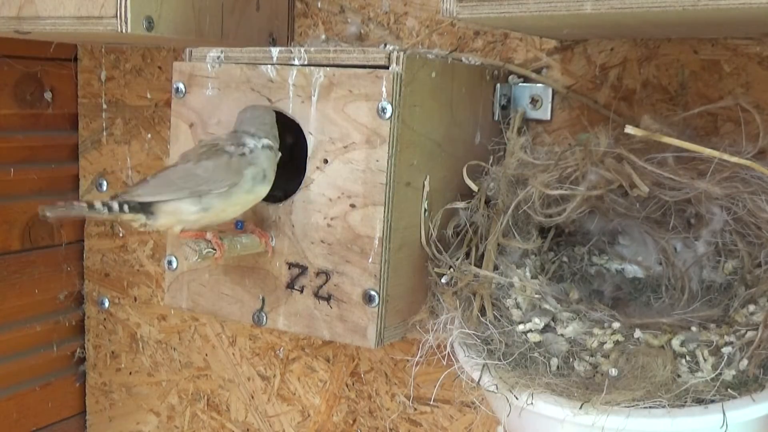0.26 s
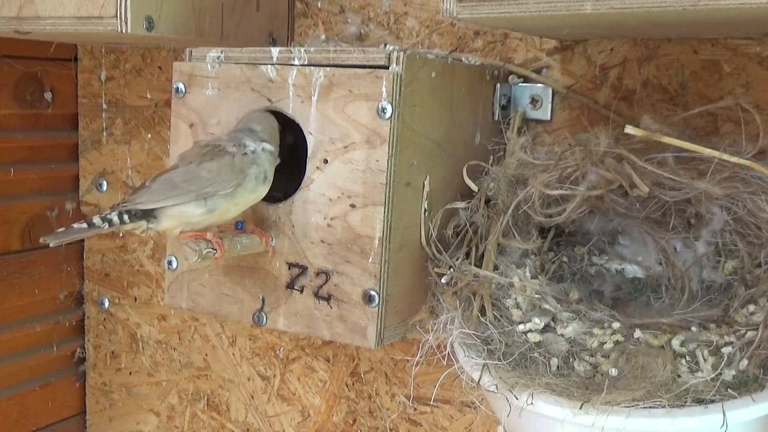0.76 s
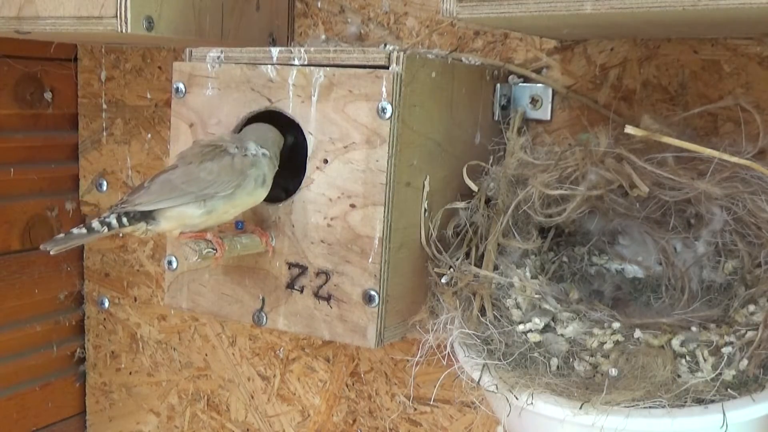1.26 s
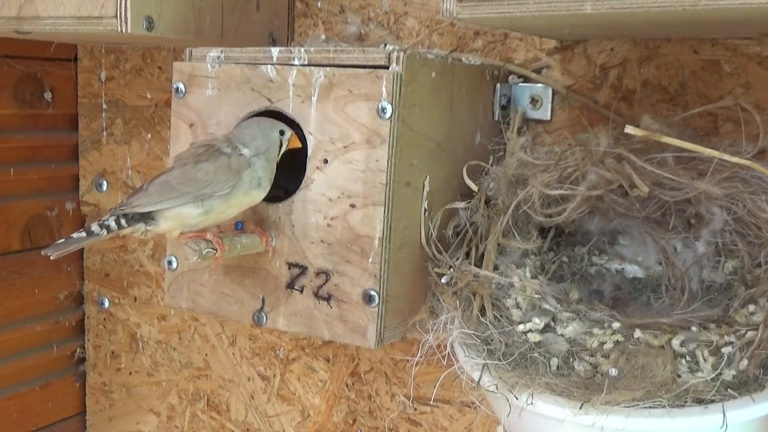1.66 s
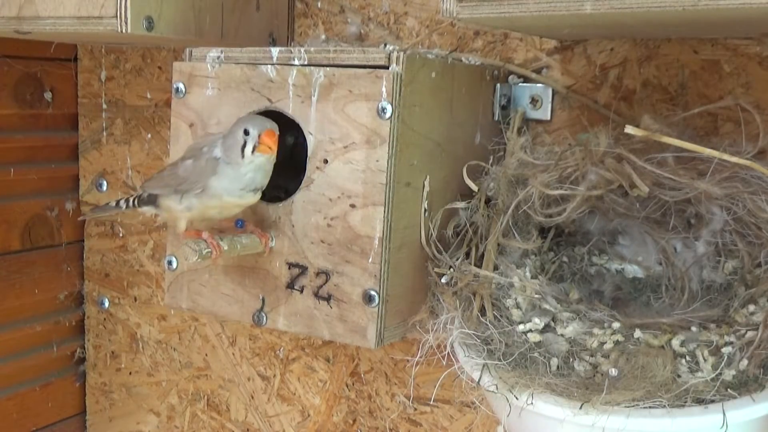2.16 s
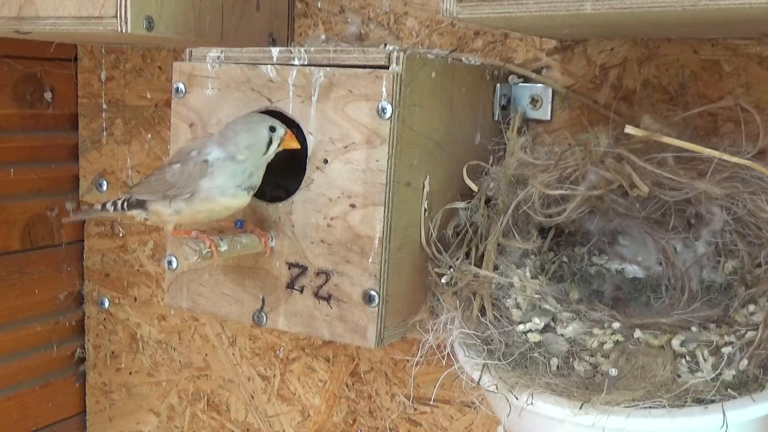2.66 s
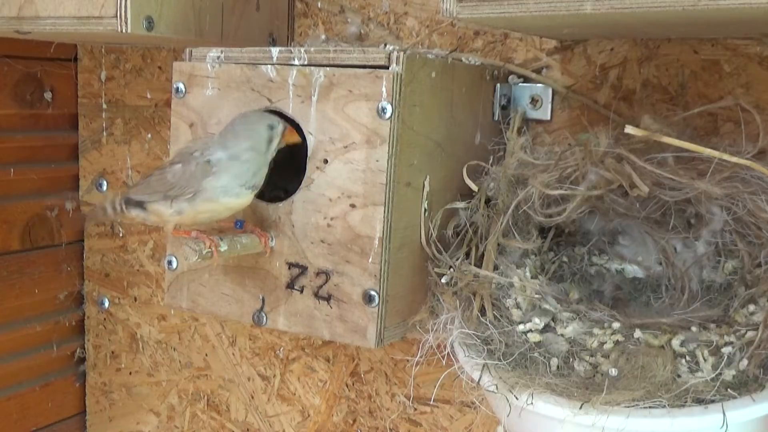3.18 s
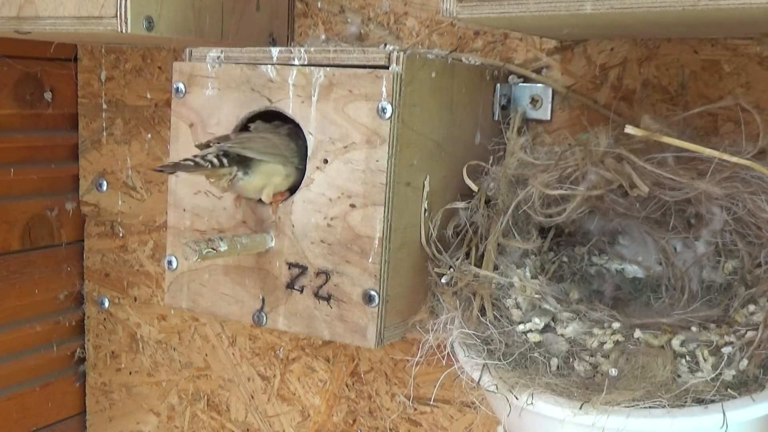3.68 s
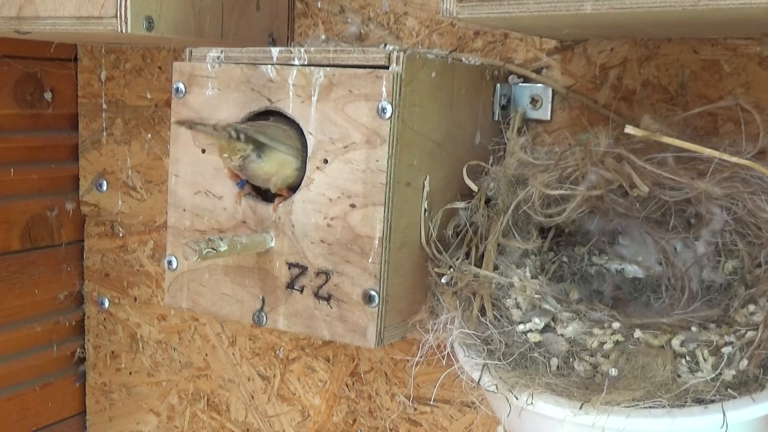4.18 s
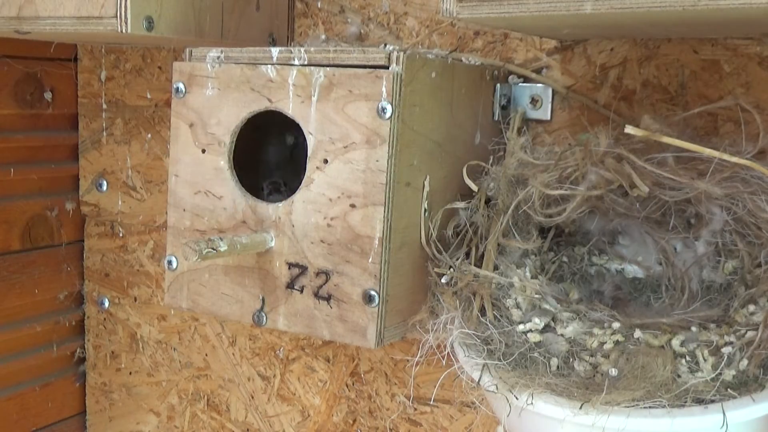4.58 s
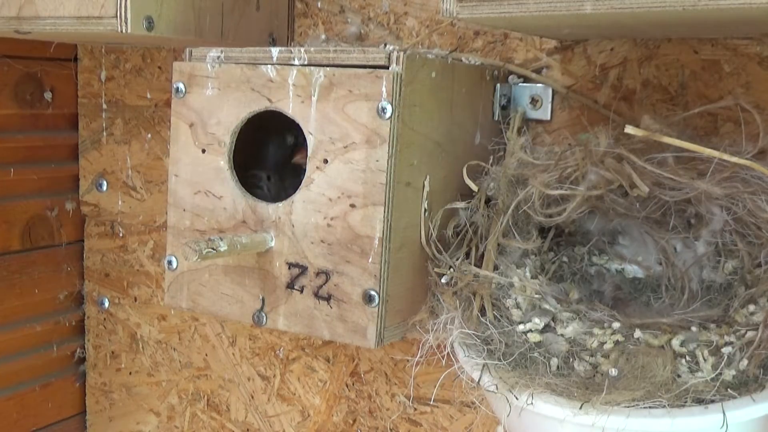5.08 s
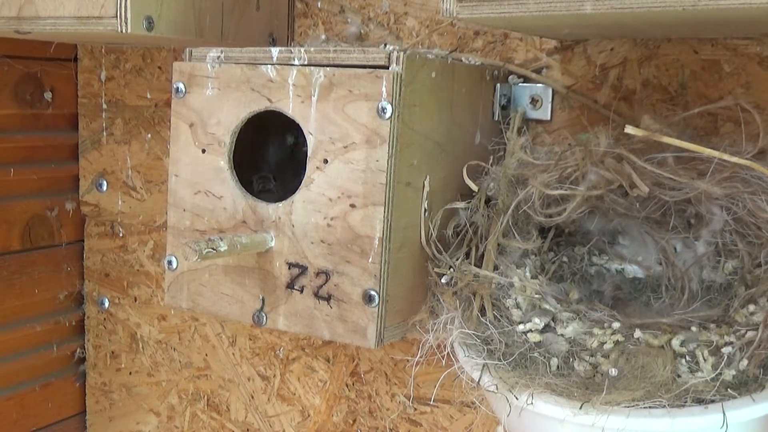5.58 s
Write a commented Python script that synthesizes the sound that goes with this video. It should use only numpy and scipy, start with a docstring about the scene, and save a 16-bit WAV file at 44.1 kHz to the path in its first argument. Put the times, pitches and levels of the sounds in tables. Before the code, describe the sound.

In a small indoor aviary, finch nestlings beg in hoarse high rasps about four times a second. Adults near and across the room add nasal beeps, short buzzes, whistles and sliding chirps, crowding into a loud flurry around three seconds. Then a bird scrabbles into a wooden box with soft thuds and claw ticks. Close stereo microphone, short room echo, faint air noise and low hum.

```python
"""Flurry in an indoor aviary

Nestlings beg in a steady run of high rasps: hoarse harmonic stacks half drowned in breath.
Adult finches, across the room and close by, trade nasal calls, pulsed buzzes, whistles and shrill
sliding chirps, with a loud flurry in the middle and the room's short echo behind them.
One bird scrabbles into a wooden nest box: filtered noise, ringing knocks and dry claw ticks.
Far chatter of patchy noise, air noise and a faint wavering hum lie underneath."""
import sys
import numpy as np
from scipy import signal
from scipy.fft import rfft, irfft, next_fast_len
from scipy.io import wavfile
from scipy.ndimage import uniform_filter1d

SR = 44100
rng = np.random.default_rng(int(sys.argv[2]) if len(sys.argv) > 2 else 0)


def boost_factor(decibels):
    """Convert a level in decibels to a linear amplitude factor."""
    exponent = np.asarray(decibels, float) / 20
    return 10 ** exponent


def store_wav(level_fs):
    """Save 16-bit WAV to argv[1]."""
    pcm = np.round(np.clip(np.atleast_2d(level_fs), -1, 1) * 32767)
    wavfile.write(sys.argv[1], SR, pcm.T.astype(np.int16))


N = 257544  # length in samples
CLOCK = np.arange(N) / SR  # seconds


def evened(x):
    """Scales to rms 1."""
    return x / np.sqrt(np.mean(x ** 2) + 1e-20)


def read(points, hz):
    """Reads a table on a log-frequency axis."""
    f, value = np.transpose(points)
    return np.interp(np.log(hz + 1), np.log(f + 1), value)


def curve(rows, column=1):
    """Joins one column of a table by straight lines over the whole length."""
    rows = np.array(rows)
    return np.interp(CLOCK, rows[:, 0], rows[:, column])


def add(mix, s, sound):
    """Mixes a sound in at time s, or at the very start if s is negative."""
    part = mix[round(max(s, 0) * SR):][:len(sound)]
    part += sound[:len(part)]


def colour(x, spectrum):
    """Filters by a spectrum in dB, then scales to rms 1."""
    length = x.shape[-1]
    size = next_fast_len(length + 512)
    gain = boost_factor(read(spectrum, np.fft.rfftfreq(size, 1 / SR)))
    filtered = irfft(rfft(x, size) * gain, size)
    return evened(filtered[..., :length])


def wander(length, seconds):
    """Smooth chance of rms 1 that changes over the given time."""
    span = max(int(seconds * SR), 1)
    smooth = uniform_filter1d(rng.standard_normal(length), span)
    return evened(uniform_filter1d(smooth, span))


def noise(alike):
    """Two channels of noise that share the part alike."""
    a, b = rng.standard_normal((2, N))
    alike = np.clip(alike, 0, 1)
    return np.array([a, alike * a + np.sqrt(1 - alike ** 2) * b])


# The faint hum under the room. Each row: time in seconds, pitch in Hz, level in dB.
HUM_PATH = [(0, 128, -50), (2.7, 128, -56), (3.3, 122, -60), (4.15, 124, -53.5), (4.3, 133, -43.5),
            (5.0, 133, -49.5), (5.3, 136, -42.5), (5.84, 137, -46.5)]


def hum():
    """A low sine that wavers in level and drifts in pitch, a little stronger on the right."""
    tone = np.sqrt(2) * np.sin(2 * np.pi * np.cumsum(curve(HUM_PATH)) / SR)
    sides_db = np.array([[-1.3], [1.3]])
    return boost_factor(curve(HUM_PATH, column=2) + 2.5 * wander(N, .03) + sides_db) * tone


# Spectrum of the air noise. Each row: frequency in Hz, relative gain in dB.
AIR_SPECTRUM = [(20, 17), (31, 3), (48, -1.5), (122, 1.5), (170, -17), (250, -6.5), (334, -23), (507, -5.5),
                (708, -16.5), (1050, -5.5), (1400, -11), (2350, -20), (7000, -18), (15600, -22)]


def air():
    """Steady noise, the same in both channels, strongest in the deepest bass."""
    return boost_factor(-38) * colour(noise(1.0), AIR_SPECTRUM)


# How fast the aviary's echo dies. Each row: frequency in Hz, time to fall 60 dB in seconds.
ROOM_DECAY = [(500, 0.11), (3000, 0.11), (8000, 0.12), (14000, 0.043)]


def room(x):
    """Echo off the walls: sparse taps of random sign, each band dying at its own speed."""
    taps = np.zeros((2, SR // 2))
    at = np.arange(200, SR // 2 - 20, 20) + rng.integers(0, 20, (2, (SR // 2 - 201) // 20))
    np.put_along_axis(taps, at, rng.choice([-1., 1.], at.shape), 1)
    taps = taps[0] + .34 * taps  # the two capsules sit close together and share most of the echo
    hz, t, z = signal.stft(taps, SR, nperseg=256)
    decay = boost_factor(-60 * t / read(ROOM_DECAY, hz)[:, None])
    tail = signal.istft(z * decay, SR, nperseg=256)[1]
    return signal.fftconvolve(x[None], tail / np.linalg.norm(tail[0]), axes=1)[:, :N]


def lulls():
    """Gain that dips briefly (or rises, where the depth is negative) just before each beg."""
    ahead_s, width_s = 0.048, 0.055
    dip_db = np.zeros(N)
    for s, _, depth_db in BEGS:
        dip_db += depth_db * np.exp(-(2 * (CLOCK - s + ahead_s) / width_s) ** 4)
    return boost_factor(-dip_db)


# Loudness of the far birds. Each row: time in seconds, level in dB.
CHATTER_LEVEL = [(0, -38), (1.05, -38.5), (1.35, -40), (1.7, -36.5), (2.45, -39), (2.9, -34.5),
                 (3.2, -33.5), (4.2, -34), (4.75, -42.5), (5.05, -34.5), (5.5, -40.5), (5.84, -41.5)]
# Spectrum of the far birds. Each row: frequency in Hz, relative gain in dB.
FAR_SPECTRUM = [(900, -14.5), (2000, -4), (3300, -2.5), (4600, -7), (7000, -2), (10500, -15.5),
                (13500, -8.5), (15700, -38)]


def chatter():
    """Birds farther off blur into noise, patchy in time and frequency, that follows the lulls."""
    hz, t, z = signal.stft(noise(0.98), SR, nperseg=512)
    patches = uniform_filter1d(rng.standard_normal(z.shape[1:]), 4, 0)
    patches = evened(uniform_filter1d(patches, 8, 1))
    blur = signal.istft(z * boost_factor(4 * patches), SR, nperseg=512)[1][:, :N]
    return boost_factor(curve(CHATTER_LEVEL)) * lulls() * colour(blur, FAR_SPECTRUM)


# Bouts of scrabbling at the nest box.
# Each row: start in seconds, length in seconds, rustle level in dB, level of the box's thud in dB.
SCRABBLE_BOUTS = [(0.12, 0.55, -43, -42.5), (0.986, 0.4, -43, -62), (3.413, 0.34, -40.5, -50),
                  (3.7, 0.61, -41, -49), (3.857, 0.21, -69, -34.5)]


def bouts(column, rest_db):
    """Gain that swells over each bout of scrabbling, on top of a resting level."""
    gain = boost_factor(rest_db) * np.ones(N)
    for row in SCRABBLE_BOUTS:
        add(gain, row[0], boost_factor(row[column]) * signal.windows.tukey(int(row[1] * SR), .45))
    return gain


def scrabble():
    """Claws and feathers rustle on wood as uneven noise, and the box thuds as deep noise."""
    scuffle = boost_factor(1.6 * wander(N, .02))
    wood = [(150, -9.0), (280, -11.0), (700, -4.0), (1200, -6.0), (2500, -25.5)]  # (Hz, dB)
    rustle = colour(noise(0.98) * scuffle, wood)
    thud = colour(noise(0.94), [(35, -4.5), (55, -3), (85, -5.5), (115, -6.0), (150, -42)])
    thud_sides = boost_factor(np.array([[-1.4], [1.4]]))  # left, right
    return bouts(column=2, rest_db=-46) * rustle + bouts(column=3, rest_db=-44) * thud * thud_sides


# Feet on the wooden box. Each row: time in seconds, level in dB.
FOOT_KNOCKS = [(0.259, -30), (0.528, -30.5), (1.275, -30), (1.918, -36), (2.723, -28.5), (3.831, -34)]


def knocks():
    """Dull bumps: the box wall rings at two low pitches for a few cycles."""
    out, t = np.zeros(N), np.arange(int(.05 * SR)) / SR
    wall = np.sin(2 * np.pi * 250 * t) + 0.62 * np.sin(2 * np.pi * 410 * t)
    for s, level_db in FOOT_KNOCKS:
        add(out, s, boost_factor(level_db - 60 * t / 0.067) * np.minimum(t / 0.0054, 1) * wall)
    return out


# Claws on wood, thin and high. Each row: time in seconds, level in dB.
CLAW_TICKS = [(0.2588, -17), (3.5319, -34), (3.5558, -29), (4.0497, -28), (4.1824, -28)]


def ticks():
    """Short dry clicks of a claw: treble noise that dies within 20 ms."""
    out, t = np.zeros(N), np.arange(int(.02 * SR)) / SR
    for s, level_db in CLAW_TICKS:
        click = colour(rng.standard_normal(len(t)), [(5000, -30), (10500, -5), (13000, 0), (15500, -1)])
        add(out, s, boost_factor(level_db - 60 * t / 0.021) * click)
    return out


# Begging rasps from the nest box. Each row: start in seconds, length in seconds,
# dip of the background just before in dB (negative for a rise).
BEGS = [(0.166, 0.19, 8), (.41, 0.16, 0.5), (0.672, 0.082, 11), (0.818, 0.2, 9), (1.107, 0.15, -6),
        (1.358, 0.15, 1), (1.6, 0.17, 5), (1.865, 0.14, 5), (2.101, 0.16, -1.5), (2.36, 0.12, -6.5),
        (2.6, 0.078, 5), (2.854, 0.1, 0), (3.118, 0.12, 16), (3.35, 0.066, 9), (3.574, 0.11, 7),
        (3.81, 0.15, 14), (4.05, 0.14, 11), (4.329, 0.14, 1), (4.568, 0.155, 1.5), (4.82, 0.14, -0.5),
        (5.075, 0.12, 2), (5.334, 0.1, -2), (5.583, 0.15, 7)]
# Spectrum through the gaping beaks. Each row: frequency in Hz, relative gain in dB.
GAPE_SPECTRUM = [(2650, -55), (4500, -21), (5930, -4), (6650, -5.5), (7190, -2.5), (7970, -7), (8670, 0.5),
                 (10500, -11), (13300, -24.5), (15600, -43)]


def begging_effort():
    """The brood warms up, then slowly tires; other broods keep up a weaker rasp between begs."""
    full_db, shy_db, warm_s, tire_db_per_s = -28, 12.5, 0.56, 0.53
    effort = boost_factor(-45.5 + 4.2 * wander(N, 0.011)) * lulls()
    for s, length, _ in BEGS:
        level_db = full_db - shy_db * np.exp(-(s / warm_s) ** 2 / 2) - tire_db_per_s * s
        add(effort, s, boost_factor(level_db) * signal.windows.tukey(int(length * SR), .55))
    return signal.lfilter([.002], [1, -.998], effort)  # the nest box rings on for a moment


def nestlings():
    """Hoarse stacks of unsteady pitch plus breath; each channel hears its own share of the brood."""
    pitch_hz = 1212
    voices = []
    for detune in (.99, 1.012):
        unsteady = 1 + 0.015 * wander(N, .03) + 0.01153 * wander(N, 0.001481)
        turns = np.cumsum(detune * pitch_hz * unsteady) / SR
        overtones = sum(np.cos(2 * np.pi * k * turns + k ** 2) for k in range(4, 13))
        rasp = .6 * evened(overtones) + rng.standard_normal(N)
        voices.append(colour(rasp, GAPE_SPECTRUM) * boost_factor(1.66 * wander(N, 0.0025)))
    a, b = voices
    return begging_effort() * evened(np.array([a + 0.81 * b, b * 1.47 + 0.33 * a]))


# Spectrum of the nasal beak. Each row: frequency in Hz, relative gain in dB.
BEAK_SPECTRUM = [(500, -18), (1030, -1), (1550, -6.5), (2060, -1), (2570, 0.5), (3600, 3), (4600, -0.5),
                 (5200, -11.5), (8000, -20.5), (11000, -44)]


def stack(hz, level_db, blur):
    """Harmonics through the beak; with distance (blur) the overtones waver and fade one by one."""
    turns = np.cumsum(hz * (1 + .008 * blur * wander(len(hz), .004))) / SR
    k = np.arange(1, 17)[:, None]
    fading = np.array([wander(len(hz), 0.021) for _ in k])
    chest_db = 5 * np.exp(-((k * hz - 2150) / 500) ** 2)  # farther calls carry best near 2 kHz
    weight = boost_factor(read(BEAK_SPECTRUM, k * hz) + blur * (3.0 * fading + chest_db))
    tone = (weight * np.sin(2 * np.pi * k * turns + k ** 2)).sum(0)
    return boost_factor(level_db) * evened(tone) * signal.windows.tukey(len(hz), .3)


# Nasal calls across the room.
# Each row: start in seconds, length in seconds, top pitch in Hz, level at the top in dB.
NASAL_CALLS = [(0.074, 0.067, 532, -37.5), (0.212, 0.084, 556, -37), (0.529, 0.07, 520, -37),
               (1.123, 0.13, 518, -36), (1.638, 0.12, 530, -34.5), (3.496, 0.09, 542.6, -31.5),
               (3.584, 0.063, 532, -28.5), (3.735, 0.1, 535.4, -29.5), (3.872, 0.087, 542.4, -30),
               (4.015, 0.14, 535, -31), (4.357, 0.14, 660.4, -30.5), (4.573, 0.058, 638, -34),
               (4.953, 0.05, 667, -29.5), (4.995, 0.084, 654, -30)]


def nasal(s, length, top_hz, level_db):
    """A short call across the room: the pitch arches and the effort swells with it."""
    u = np.linspace(0, 1, int(length * SR))
    arch = np.sin(np.pi * u)
    end_share = np.where(u < .5, .91, .94)  # pitch at the start and the end, as a share of the top
    hz = top_hz * (1 - (1 - end_share) * (1 - arch))
    return s, stack(hz, level_db - 7 * (1 - arch), blur=1.58)


# One long call close by. Each row: time in seconds, pitch in Hz, level in dB.
NEAR_CALL_PATH = [(5.145, 425, -10), (5.166, 453, -30), (5.184, 503, -27), (5.208, 513.4, -24.5),
                  (5.251, 511.7, -25.5), (5.295, 498.6, -27.5), (5.314, 470, -45), (5.335, 473, -40)]


def near_call():
    """The long call close by, clean and bright, its pitch and level following the table."""
    s, pitch_hz, level_db = np.transpose(NEAR_CALL_PATH)
    t = np.arange(s[0], s[-1], 1 / SR)
    return s[0], stack(np.interp(t, s, pitch_hz), np.interp(t, s, level_db), blur=0.33)


# Buzzes. Each row: start in seconds, length in seconds, level in dB, level of the low lead note in dB.
BUZZ_CALLS = [(0.005, 0.046, -24.5, -29), (0.279, 0.032, -27.5, -36), (0.411, 0.044, -26.5, -31),
              (1.263, 0.017, -29, -44), (1.477, 0.043, -29.5, -38), (1.937, 0.066, -37, -53),
              (2.081, 0.041, -23.5, -28.5), (2.284, 0.048, -20.5, -28.5), (2.346, 0.036, -34.5, -56),
              (3.22, 0.038, -31.5, -31.5)]
# Spectrum of a buzz through the open beak. Each row: frequency in Hz, relative gain in dB.
BUZZ_SPECTRUM = [(500, -81), (850, -8), (1040, -6), (2060, -6), (2390, 0), (3350, -4), (4170, -4),
                 (7760, -18.5), (9530, -14), (15500, -31)]


def buzz(s, length, level_db, note_db):
    """Uneven sharp pulses and breath through an open beak, slowing as they swell and fade."""
    start_hz, end_hz = 851.3, 470  # pulse rate
    count = int(length * SR)
    rate = end_hz + (start_hz - end_hz) * np.linspace(1, 0, count) ** 2.5
    turns = np.cumsum(rate * (1 + .1 * wander(count, 0.0015))) / SR
    pulses = -np.diff(np.floor(turns), prepend=0) * boost_factor(0.69 * wander(count, 0.0055))
    drive = evened(pulses) + 0.65 * rng.standard_normal(count)
    return s, boost_factor(level_db) * colour(drive, BUZZ_SPECTRUM) * np.hanning(count) ** 0.29


def lead_note(s, length, level_db, note_db):
    """The low falling note that opens a buzz, starting 15 ms ahead of it."""
    return chirp(s - .015, 0.0272, 1150, 1000, note_db, strongest=0.92)


# Whistles, nearly pure.
# Each row: start in seconds, length in seconds, start pitch in Hz, end pitch in Hz, level in dB.
WHISTLE_CALLS = [(1.051, 0.045, 3460, 4140, -29.5), (1.083, 0.04, 4150, 3750, -25),
                 (1.563, 0.041, 5280, 4840, -35.5), (1.731, 0.047, 3310, 3140, -35),
                 (2.036, 0.06, 2564, 2520, -37.5), (2.565, 0.071, 2445, 2870, -37),
                 (2.753, 0.048, 5410, 6310, -17), (2.82, 0.049, 6360, 5960, -18.5),
                 (3.183, 0.047, 4100, 4270, -22.5), (3.354, 0.065, 4080, 4790, -22),
                 (3.415, 0.046, 3500, 3333, -22.5), (3.518, 0.012, 4060, 4470, -20.5),
                 (3.815, 0.011, 5840, 6100, -24), (4.13, 0.027, 4300, 4020, -31),
                 (5.7, 0.12, 3030, 2144, -38), (5.799, 0.013, 2240, 3020, -30.5),
                 (5.815, 0.036, 2975, 2750, -19.5)]


def whistle(*row):
    """A chirp that favours its fundamental: its overtone weights centre below it."""
    return chirp(*row, strongest=0.37)


# Chirps, rich in overtones.
# Each row: start in seconds, length in seconds, start pitch in Hz, end pitch in Hz, level in dB.
CHIRP_CALLS = [(0.131, 0.034, 3010, 3060, -27.5), (0.442, 0.033, 3190, 3220, -15.5),
               (0.464, 0.058, 3530, 3576, -19.5), (0.513, 0.1, 3730, 3530, -35.5),
               (0.801, 0.0096, 2700, 3490, -22.5), (0.983, 0.016, 3760, 3250, -21),
               (1.015, 0.028, 2360, 2414, -22), (1.546, 0.028, 3380, 3130, -29),
               (1.561, 0.056, 2105, 2020, -32), (2.207, 0.018, 3198, 3510, -26.5),
               (2.232, 0.037, 2080, 2040, -31.5), (2.676, 0.023, 2227, 2357, -18),
               (2.686, 0.025, 3150, 2824, -21.5), (2.888, 0.04, 1953, 2250, -18),
               (2.959, 0.05, 2405, 2674, -17), (2.977, 0.026, 3100, 3036, -17.5),
               (3.018, 0.024, 2940, 2580, -16), (3.036, 0.05, 2264, 2050, -17.5),
               (3.054, 0.023, 2990, 2960, -27), (3.083, 0.074, 2183, 2097, -17.5),
               (3.158, 0.036, 2240, 2670, -17), (3.237, 0.051, 2580, 2915, -18.5),
               (4.102, 0.023, 3230, 3400, -25.5), (4.548, 0.067, 3000, 3057, -27.5),
               (4.619, .07, 3030, 2685, -32.5), (5.124, 0.0092, 4100, 3920, -20.5),
               (5.635, 0.088, 3470, 3300, -36.5)]
# Spectrum of the breath in forced chirps. Each row: frequency in Hz, relative gain in dB.
BREATH_SPECTRUM = [(1500, -58), (2500, 5.5), (6000, 2.5), (13000, 7.5), (15700, -47)]


def chirp(s, length, start_hz, end_hz, level_db, strongest=None):
    """A whistle with overtones slides fast and settles; force roughens the pitch and adds breath."""
    u = np.linspace(0, 1, int(length * SR))
    force = np.clip((level_db + 33.5) / 15, .1, 1.2)
    hz = end_hz + (start_hz - end_hz) * (1 - u) ** 3.16
    if strongest is None:  # the throat favours overtones near one pitch, which rises with force
        throat_hz, throat_forced_hz = 3750, 5950
        strongest = (throat_hz + (throat_forced_hz - throat_hz) * min(force, 1)) / end_hz
    jitter = (.008 + .018 * force) * wander(len(u), .001)
    turns = np.cumsum(hz * (1 + jitter)) / SR
    k = np.arange(1, 7)[:, None]
    weight = boost_factor(-7 * (k - strongest) ** 2) + 0.24 * force ** 2 + 0.12 * (k == 1)
    weight = weight * (k * hz < 15500)
    weight = weight * boost_factor(2.2 * rng.standard_normal((len(k), 1)))  # uneven overtones
    tone = evened((weight * np.sin(2 * np.pi * k * turns + k ** 2)).sum(0))
    breath = colour(rng.standard_normal(len(u)), BREATH_SPECTRUM)
    # a hoarse flutter, slower and faster
    throb = boost_factor(2.2 * force * wander(len(u), .0015)) * (.9 + .45 * force * wander(len(u), .0006))
    shape = np.minimum(u * length / 0.0054, 1) * np.minimum((1 - u) / 0.3, 1) * boost_factor(-3 * u)
    return s, boost_factor(level_db) * shape * throb * (tone + 0.29 * force ** 2 * breath)


def adults():
    """Every call of the adult finches on one dry channel."""
    calls = np.zeros(N)
    add(calls, *near_call())
    for voice, table in ((nasal, NASAL_CALLS), (chirp, CHIRP_CALLS), (whistle, WHISTLE_CALLS),
                         (buzz, BUZZ_CALLS), (lead_note, BUZZ_CALLS)):
        for row in table:
            add(calls, *voice(*row))
    return calls


def scene():
    """The background, the nest box, the nestlings, and the adults with their echo."""
    background = hum() + air() + chatter()
    nest_box = scrabble() + knocks() + ticks()
    calls = adults()
    direct = calls * boost_factor(np.array([[.3], [-.3]]))  # a touch to the left
    return background + nest_box + nestlings() + direct + boost_factor(-1.5) * room(calls)


def low_pass(x):
    """Removes everything above the highest recorded frequency."""
    return signal.sosfilt(signal.butter(12, 15760, fs=SR, output="sos"), x)


def record(dry):
    """The loudest chirps round off smoothly in the microphone amplifier."""
    ceiling = .68  # full scale is 1
    return low_pass(ceiling * np.tanh(dry / ceiling))


dry = scene()
out = record(dry)
store_wav(out)
```